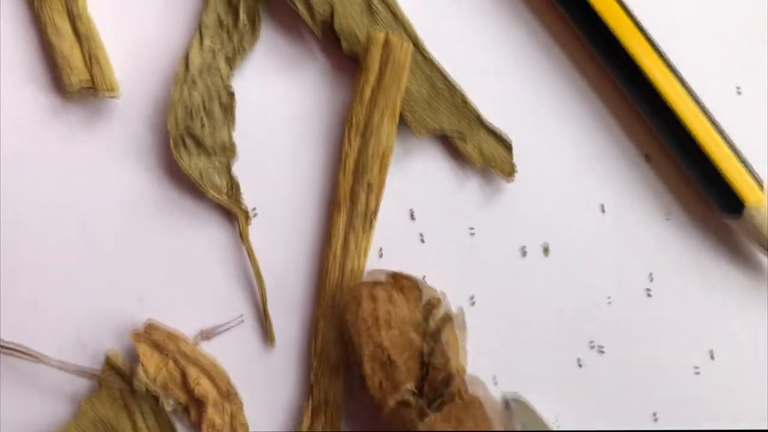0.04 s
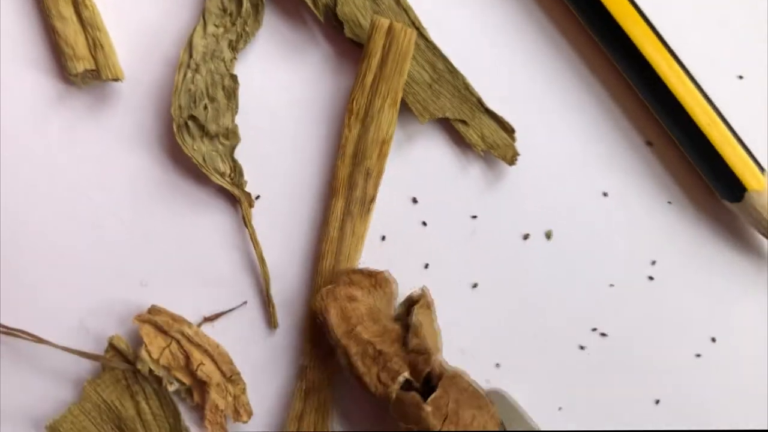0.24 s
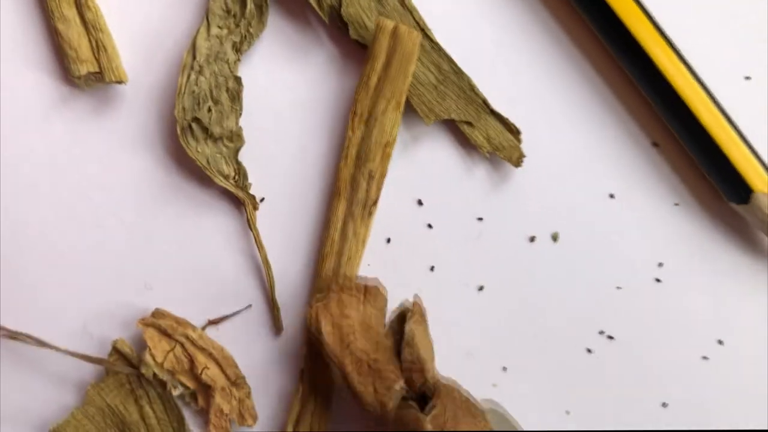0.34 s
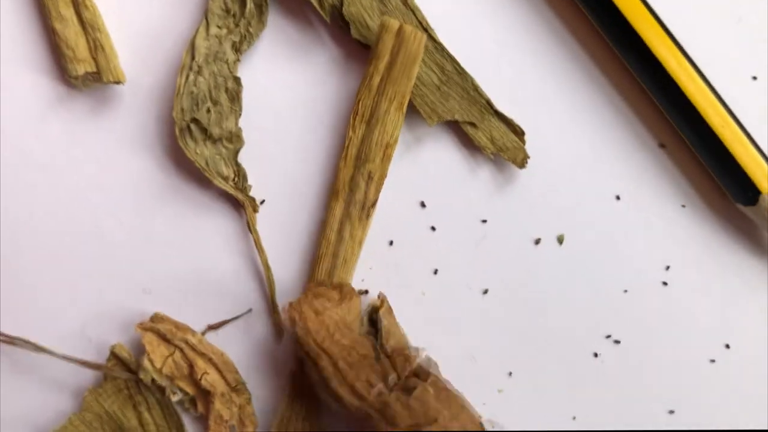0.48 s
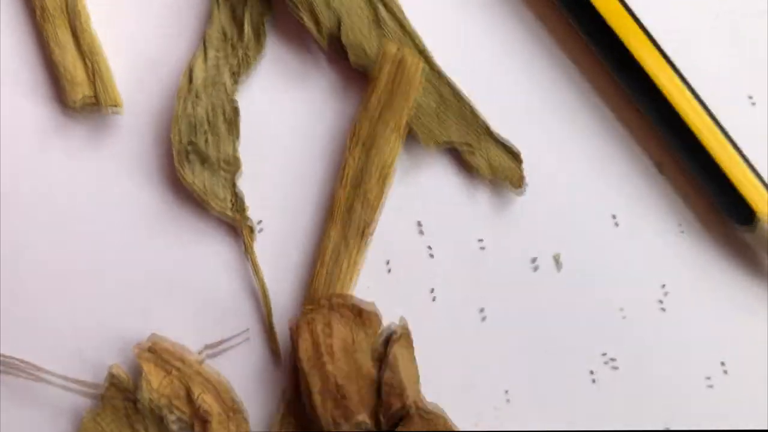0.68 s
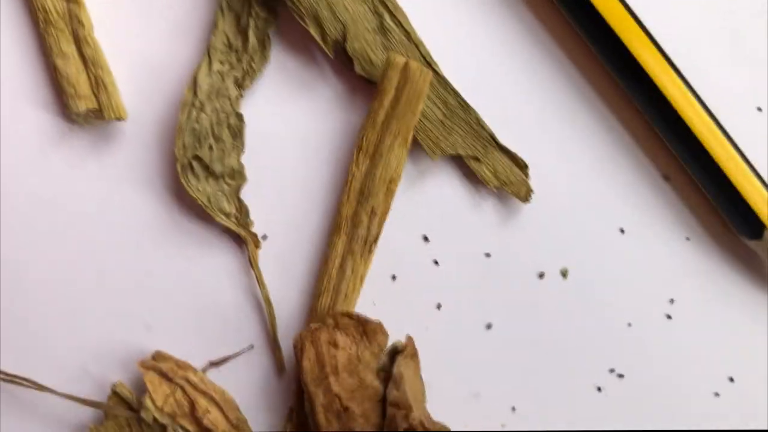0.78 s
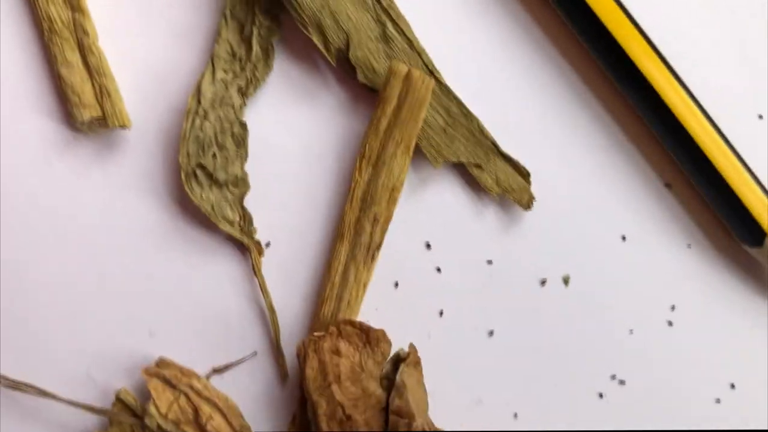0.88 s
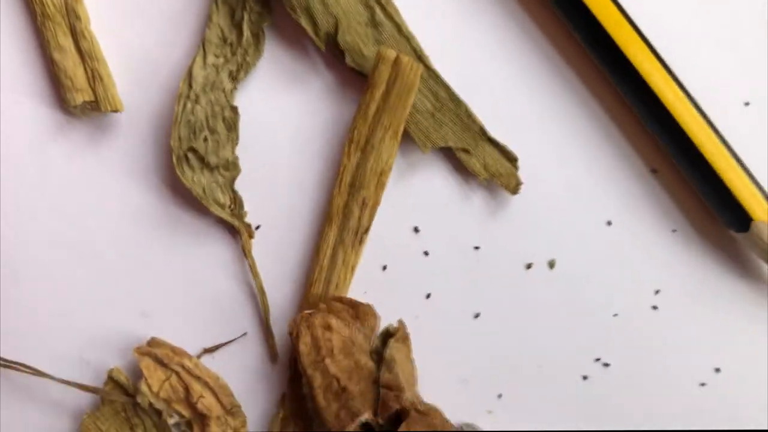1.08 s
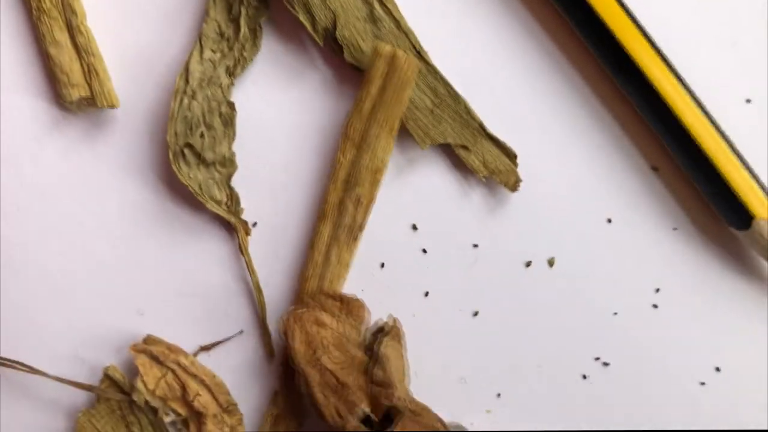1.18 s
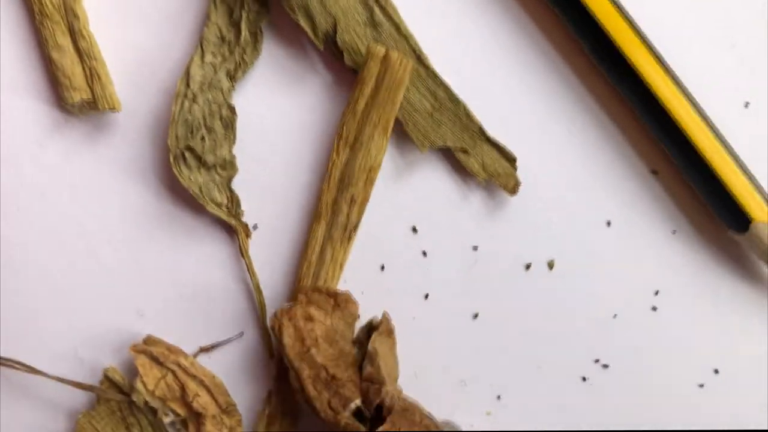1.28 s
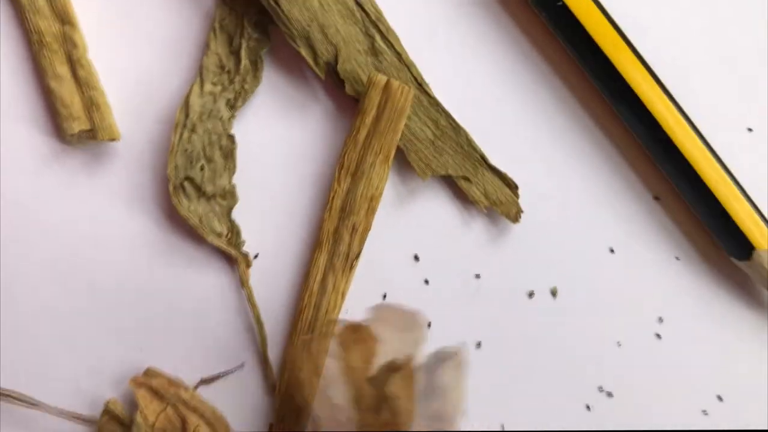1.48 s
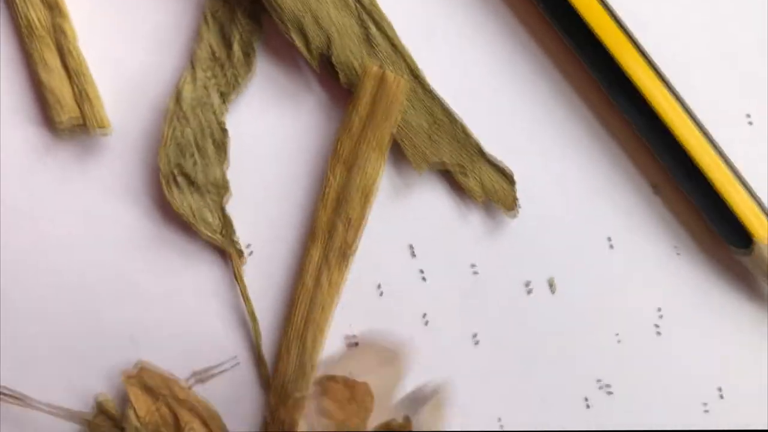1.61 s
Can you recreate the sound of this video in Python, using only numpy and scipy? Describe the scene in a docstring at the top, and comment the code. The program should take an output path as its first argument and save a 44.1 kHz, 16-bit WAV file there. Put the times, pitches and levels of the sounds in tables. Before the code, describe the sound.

Dry stems and a seed capsule crackle as they are pressed over paper on a table. Short scrapes and snaps build to a crunch, pause, then return with one hard break and faint seed ticks, close by in a quiet room.

```python
"""Dry stems and a seed capsule are pressed and dragged over paper on a table, close by in a quiet room.
First the husk scrapes in short grainy strokes and brittle fibres snap: each snap clicks, rings the husk
and sends a wave through the sheet, whose low notes arrive late. Near half a second the capsule gives way
in a crunch. After a lull the scraping and snapping return, with one hard, clean break.
Last, a few loose seeds tick down as the scraping fades."""
import sys
import numpy as np
from scipy import signal
from scipy.fft import rfft, irfft, next_fast_len
from scipy.io import wavfile
from scipy.ndimage import map_coordinates

SR = 44100
rng = np.random.default_rng(int(sys.argv[2]) if len(sys.argv) > 2 else 0)


def waveform_to_disk(signal):
    """Save audio, clipped to [-1, 1], as 16-bit WAV at the path in sys.argv[1]."""
    frames = np.transpose(np.atleast_2d(signal))
    scaled = np.clip(frames, -1, 1) * 32767
    samples = np.round(scaled).astype(np.int16)
    wavfile.write(sys.argv[1], SR, samples)


N = 72765
HIT_SIZE = 4096  # samples in one short sound


def amp(db):
    """Turn decibels into a gain."""
    return 10 ** (np.asarray(db) / 20)


def fade(t, t60_s):
    """A dying level: every t60 in this file is the time it takes to fall by 60 dB."""
    return amp(-60 * t / t60_s)


def unit(x):
    """Scale to an average (rms) level of 1."""
    return x / np.sqrt(np.mean(x ** 2) + 1e-20)


def pulse(x):
    """Scale to the energy of one millisecond at level 1."""
    return x * np.sqrt(SR * .001 / (np.sum(x ** 2) + 1e-20))


def blend(a, b, share):
    """Mix two pulses, giving b this share of the energy."""
    share = np.clip(share, 0, 1)
    return pulse(np.sqrt(1 - share) * pulse(a) + np.sqrt(share) * pulse(b))


def colour(points):
    """A click with the given tone colour: rows of pitch_hz, level_db."""
    pitch_hz, level_db = np.transpose(points)
    hz = np.fft.rfftfreq(HIT_SIZE, 1 / SR)
    gain = amp(np.interp(np.log(hz + 1), np.log(pitch_hz), level_db))
    cepstrum = irfft(np.log(gain))
    cepstrum[1:HIT_SIZE // 2] *= 2  # folding this in half packs the energy at the start of the click
    cepstrum[HIT_SIZE // 2 + 1:] = 0
    return irfft(np.exp(rfft(cepstrum)))


def through(x, response):
    """Filter x with a response, keeping its length."""
    return signal.fftconvolve(x, response)[:len(x)]


def ringing(modes):
    """The fading tones of a tapped object, with energy 1."""
    t = np.arange(2 * HIT_SIZE) / SR
    ring = sum(amp(db) * fade(t, t60) * np.cos(2 * np.pi * hz * t) for hz, db, t60 in modes)
    return ring / np.linalg.norm(ring)


def add(track, start_s, sound):
    """Lay a sound into a track."""
    part = track[max(round(start_s * SR), 0):][:len(sound)]
    part += sound[:len(part)]


def grains(response, scatter_db, per_s=9000):
    """A dense run of tiny slips of uneven size, heard through a response."""
    slips = (rng.random(N) < per_s / SR) * rng.choice([-1, 1], N)
    sizes = amp(scatter_db * np.clip(rng.standard_normal(N), -2, 2))
    return unit(through(slips * sizes, response))


# tone colour of the quiet room: pitch_hz, level_db
ROOM_COLOUR = [(25, -31), (60, -4.5), (110, -1), (220, -4.5), (550, -10.5), (1500, -20.5), (5000, -25.5),
               (13000, -33), (15000, -37)]

def room_tone(noise_db=-69, hum_hz=119.5, hum_db=-76):
    """Soft steady noise and a faint mains hum."""
    noise = unit(through(rng.standard_normal(N), colour(ROOM_COLOUR)))
    hum = np.sqrt(2) * np.sin(2 * np.pi * hum_hz * np.arange(N) / SR)
    return amp(noise_db) * noise + amp(hum_db) * hum


# tones the table rings at: pitch_hz, level_db, t60_s
TABLE_TONES = [(121.6, -8, .15), (210, -5, .13), (384.4, 0, .13), (537.6, -1.5, 0.073), (622, -5.5, 0.098)]

def table_and_room(plant, table_db=-26, room_db=-18.5):
    """The plant's sounds ring the table faintly, and the room adds a short echo."""
    t = np.arange(2 * HIT_SIZE) / SR
    echo = rng.standard_normal(len(t)) * fade(t, t60_s=.14)
    echo /= np.linalg.norm(echo)
    return through(plant, amp(table_db) * ringing(TABLE_TONES) + amp(room_db) * echo)


# seeds landing: start_s, level_db
SEED_LANDINGS = [(1.183, -42), (1.195, -41), (1.2945, -52), (1.4634, -44), (1.5052, -58), (1.5495, -56),
                 (1.5715, -55), (1.632, -54)]
# tone colour of a landing: pitch_hz, level_db
SEED_COLOUR = [(1500, -18), (4500, 0), (16000, -4)]

def seed_ticks():
    """Loose seeds, too light to move the sheet, land with a thin click and a brief skitter."""
    out, t, click = np.zeros(N), np.arange(HIT_SIZE) / SR, colour(SEED_COLOUR)
    for start_s, level_db in SEED_LANDINGS:
        skitter = rng.standard_normal(HIT_SIZE) * fade(t, t60_s=.011)
        add(out, start_s, amp(level_db) * blend(click, through(skitter, click), share=.57))
    return out


# strokes of the husk over the paper: start_s, end_s, sheet_db, husk_db, fizz_db
SCRAPE_STROKES = [(0.0455, 0.056, -49, -63.5, -78), (0.06, 0.084, -53, -51, -61.5),
                  (0.088, 0.094, -51.5, -44.5, -57), (0.102, 0.133, -59, -79, -77),
                  (.128, 0.134, -53, -50, -60), (0.148, 0.162, -48, -54, -59),
                  (0.184, 0.208, -58, -61, -70), (0.206, 0.226, -49.5, -47, -55),
                  (0.22, 0.312, -59.5, -73, -80), (0.305, 0.336, -51, -52.5, -60),
                  (0.342, 0.44, -55, -61, -81), (0.432, 0.442, -50, -51, -74),
                  (0.477, 0.503, -52, -56, -74), (0.523, 0.534, -59, -53, -67),
                  (0.581, 0.602, -52, -53, -66), (0.615, 0.642, -66, -63, -76.5),
                  (0.664, 0.815, -72, -80.5, -86), (0.998, 1.007, -50.5, -58.5, -74.5),
                  (1.018, 1.068, -56.5, -64, -65), (1.059, 1.095, -64.5, -70, -74),
                  (1.093, 1.099, -48.5, -48, -53), (1.112, 1.143, -51, -53.5, -63),
                  (1.162, 1.169, -47, -61, -63), (1.217, 1.252, -56.5, -58, -63),
                  (1.254, 1.277, -50.5, -56, -58.5), (1.308, 1.331, -60.5, -58.5, -70),
                  (1.345, 1.377, -51, -64, -67.5), (1.383, 1.41, -57, -61.5, -70),
                  (1.397, 1.439, -55, -59.5, -65.5), (1.442, 1.657, -90, -81.5, -81.5)]
# tone colours of the rubbed sheet, the husk (also in snaps) and the fizz: pitch_hz, level_db
RUB_COLOUR = [(40, -27.5), (120, -4.5), (260, -6), (450, -3.5), (650, 1), (1050, 0), (1450, -5.5),
              (2300, -7), (3100, -15), (6000, -36)]
HUSK_COLOUR = [(1000, -40.5), (2800, -17), (3600, -3), (4400, -4.5), (5500, 0.5), (6600, -5), (7600, -3.5),
               (8800, -10), (13000, -29)]
FIZZ_COLOUR = [(3000, -37), (7000, -14), (9300, 1.5), (11500, -2), (13800, -2.5), (15700, -7.5),
               (16400, -31)]

def scraping(rise_share=.12, fall_db_per_s=1105.5, clumps_per_s=330, clump_db=3):
    """Strokes swell, hold and die away; their tiny slips sound in the sheet, the husk and a fine fizz."""
    t, power = np.arange(N) / SR, np.zeros((3, N))
    for start_s, end_s, *levels_db in SCRAPE_STROKES:
        rise_s = max(rise_share * (end_s - start_s), .001)
        swell = np.clip((t - start_s) / rise_s + .5, 0, 1)
        fall = amp(-fall_db_per_s * np.maximum(t - end_s, 0))
        power += (amp(levels_db)[:, None] * swell * fall) ** 2
    wobble = map_coordinates(rng.standard_normal(HIT_SIZE), [t * clumps_per_s])
    clumps = unit(amp(clump_db * wobble))  # the husk catches in clumps
    rub, husk, fizz = (grains(colour(c), scatter_db=5.5) for c in (RUB_COLOUR, HUSK_COLOUR, FIZZ_COLOUR))
    return (np.sqrt(power) * [rub, clumps * husk, fizz]).sum(axis=0)


# how long a 1 kHz wave takes through the sheet as the plant shifts: time_s, travel_s
SHEET_TRAVEL = [(.4, .0028), (1.1, 0.002028)]

def sheet_wave(sound, start_s, front_hz=4044):
    """Low notes travel slower in a bending sheet, so pitches below front_hz arrive late."""
    hz = np.minimum(np.fft.rfftfreq(2 * HIT_SIZE, 1 / SR), front_hz)
    travel_s = np.interp(start_s, *np.transpose(SHEET_TRAVEL))
    # speed grows with the square root of frequency
    lag_cycles = travel_s * np.sqrt(1000) * (2 * np.sqrt(hz) - hz / np.sqrt(front_hz))
    return irfft(rfft(sound, 2 * HIT_SIZE) * np.exp(-2j * np.pi * lag_cycles))[:HIT_SIZE]


# tone colours of the cracking capsule and of its knock on the sheet: pitch_hz, level_db
CRUNCH_COLOUR = [(60, -24.5), (220, -11), (550, -6), (980, 0), (1550, -17), (2050, -27.5), (2450, -9.5),
                 (3040, -29.5), (4100, -8), (5700, -0.5), (7300, 2), (8400, -5.5), (15500, -18)]
KNOCK_COLOUR = [(250, -21), (980, 0), (1900, -23)]
# tones the hollow capsule rings at: pitch_hz, level_db, t60_s
CAPSULE_TONES = [(4920, -5, .05), (5560, -2, .06), (6471, -2, .05), (7470, -7, .03)]

def crunch(start_s=.4545, peak_db=-25.5, rise_db_per_s=2601, fall_db_per_s=630.5,
           knock_db=-23, ring_db=-12.5):
    """The hollow capsule gives way: a rush of small cracks and a knock on the sheet set it ringing."""
    t = np.arange(N) / SR - start_s
    level_db = peak_db + np.minimum(rise_db_per_s * t, -fall_db_per_s * t)
    cracks = amp(level_db) * grains(colour(CRUNCH_COLOUR), scatter_db=1)
    collapse = through(cracks, sheet_wave(np.ones(1), start_s))
    knock = pulse(sheet_wave(colour(KNOCK_COLOUR), start_s))
    add(collapse, start_s, amp(knock_db) * knock)
    return collapse + amp(ring_db) * through(collapse, ringing(CAPSULE_TONES))


# fibres breaking: start_s, thump_db, ring_db, edge_db, pitch_hz
FIBRE_SNAPS = [(0.0665, -42, -42, -47, 5170), (0.0934, -69, -34.5, -61, 5500),
               (0.1499, -32.5, -39, -45.5, 4960), (0.185, -51, -39, -60, 5660),
               (0.219, -37, -41, -52, 5600), (.2388, -43, -32, -34, 5240),
               (0.2445, -51, -28.5, -35.5, 7430), (0.2676, -25, -23, -25.5, 5090),
               (0.3103, -59, -48, -42, 5500), (0.3503, -38, -32, -29, 5200), (.3532, -34.5, -38, -38, 5000),
               (0.3591, -42, -32, -38, 7600), (.37, -45, -29.5, -30, 7500), (0.4038, -28, -24, -24, 5820),
               (0.4545, -44, -21.5, -33, 5830), (0.4566, -44, -20, -24.5, 5830),
               (0.4621, -31, -23, -44.5, 7200), (.473, -39, -28, -43.5, 6560), (0.519, -58, -42, -60, 4800),
               (0.547, -61, -37, -48, 6360), (0.5513, -48.5, -34.5, -47.5, 6270),
               (0.6154, -63.5, -48, -50, 5570), (0.7011, -51.5, -64.5, -82, 5200),
               (0.7787, -51, -59, -61.5, 4870), (1.0981, -50, -34.5, -63, 5700),
               (1.1381, -56, -30, -34, 5900), (1.1596, -19, -19.5, -22.5, 3660),
               (1.1808, -52, -39, -45, 4030), (1.2316, -40.5, -28, -37, 6030),
               (1.2398, -53, -44, -41, 5900), (1.251, -42.5, -56, -49, 4300), (1.2817, -59, -52, -45, 7300),
               (1.3223, -48, -40, -49.5, 5700), (1.4035, -34, -40, -47, 5460),]
# tone colours of the sheet's thump, a ragged break's click and a clean one's: pitch_hz, level_db
THUMP_COLOUR = [(40, -35), (120, -15), (250, -14.5), (420, -12.5), (680, -1.5), (1050, -0.5), (1400, -9.5),
                (1900, -7.5), (2500, -8.5), (3100, -30.5), (6000, -41)]
RAGGED_COLOUR = [(3000, -47.5), (7000, -7), (9300, 9), (11500, -1), (13800, 2.5), (15500, -5),
                 (17000, -23.5)]
CLEAN_COLOUR = [(10500, -22), (13200, -0.5)]

def snaps(clean_break_db=-20, ring_share=.87, splinter_share=.22):
    """Each breaking fibre clicks, rings the husk and sends a falling chirp through the sheet."""
    out, t = np.zeros(N), np.arange(HIT_SIZE) / SR
    sheet, husk = colour(THUMP_COLOUR), colour(HUSK_COLOUR)
    ragged_click, clean_click = colour(RAGGED_COLOUR), colour(CLEAN_COLOUR)
    for start_s, thump_db, ring_db, edge_db, pitch_hz in FIBRE_SNAPS:
        # harder snaps break in one go: brighter, with less pure tone and fewer splinters
        ragged = 1 / (1 + amp(thump_db - clean_break_db) ** 2)
        splinters = rng.standard_normal(HIT_SIZE) * fade(t, t60_s=.011)  # tiny trailing cracks
        tone = np.cos(2 * np.pi * pitch_hz * t) * fade(t, t60_s=.0057)
        ring = blend(husk, tone, ring_share * ragged)
        ring = blend(ring, through(splinters, husk), splinter_share * ragged)
        click = blend(ragged_click, clean_click, 2 * (1 - ragged) ** 2)
        edge = blend(click, through(splinters, click), splinter_share * ragged)
        thump = pulse(sheet_wave(sheet, start_s))
        add(out, start_s, amp(thump_db) * thump + amp(ring_db) * ring + amp(edge_db) * edge)
    return out


def scene():
    """The plant, the table and the quiet room, in mono."""
    plant = snaps() + seed_ticks() + scraping() + crunch()
    return (plant + table_and_room(plant) + room_tone())[None]


def record(dry):
    """Cut away the very highest treble."""
    top_hz = 16600
    size = next_fast_len(N + HIT_SIZE)
    hz = np.fft.rfftfreq(size, 1 / SR)
    return irfft(rfft(dry, size) / (1 + (hz / top_hz) ** 120), size)[:, :N]


dry = scene()
out = record(dry)
waveform_to_disk(out)
```